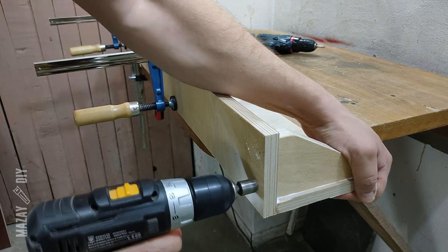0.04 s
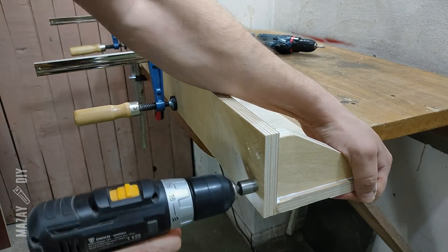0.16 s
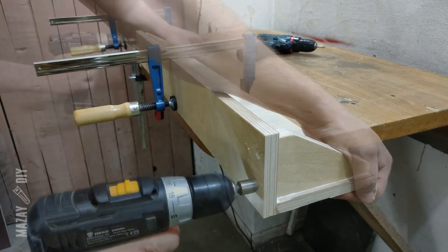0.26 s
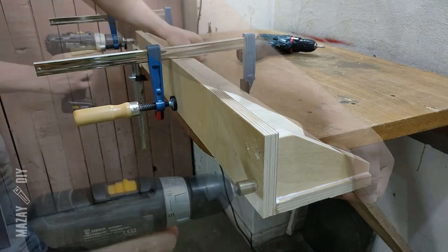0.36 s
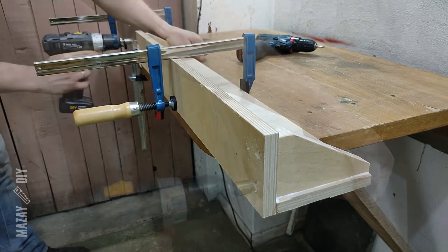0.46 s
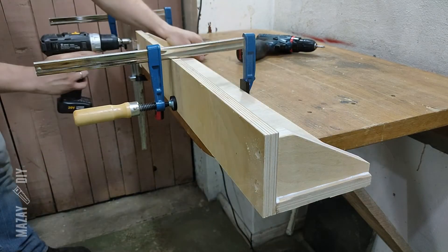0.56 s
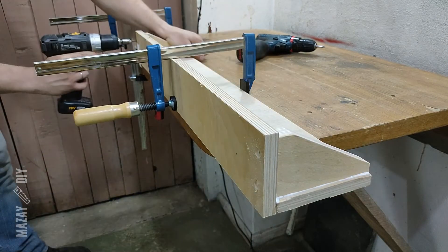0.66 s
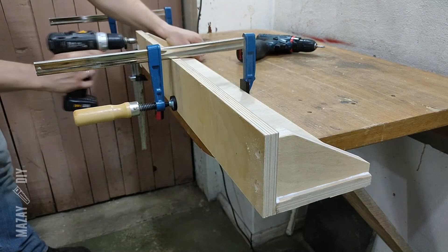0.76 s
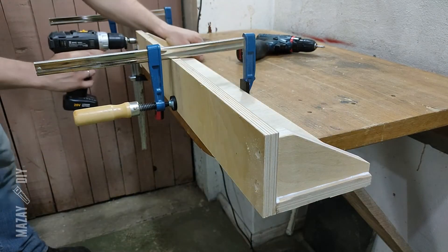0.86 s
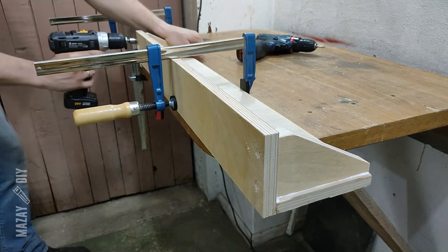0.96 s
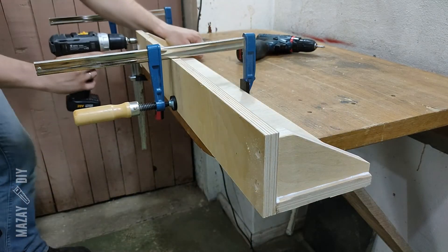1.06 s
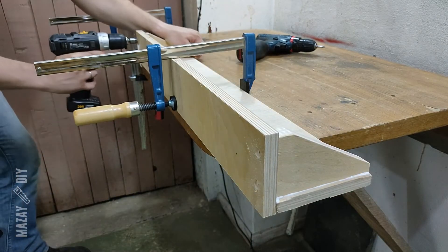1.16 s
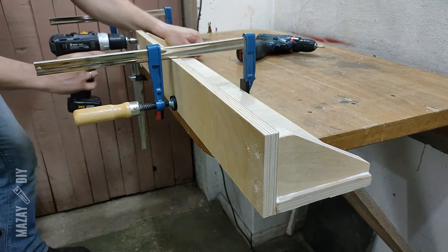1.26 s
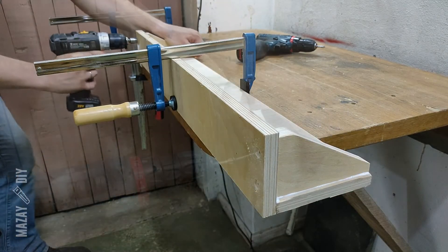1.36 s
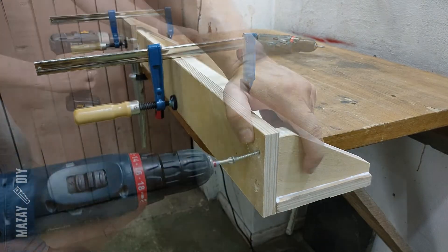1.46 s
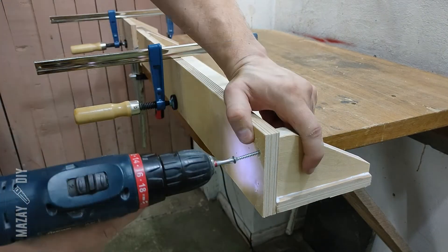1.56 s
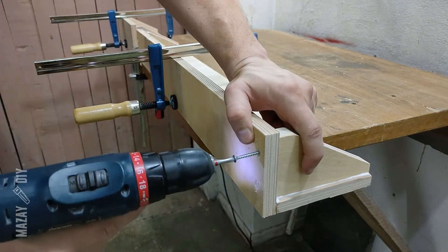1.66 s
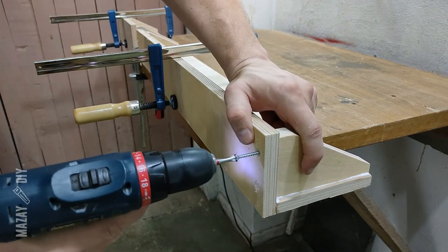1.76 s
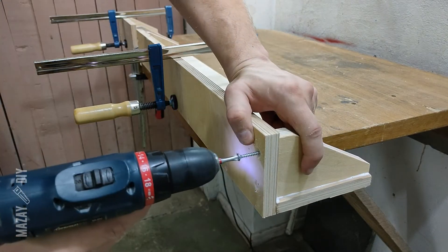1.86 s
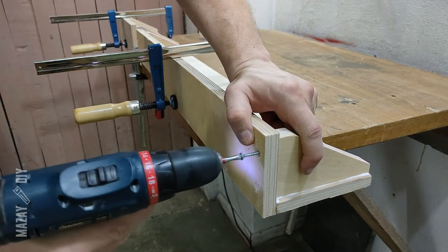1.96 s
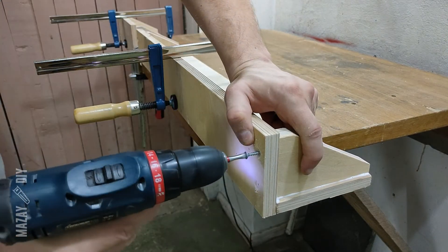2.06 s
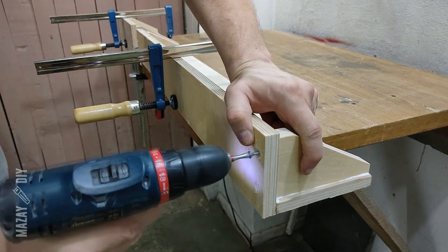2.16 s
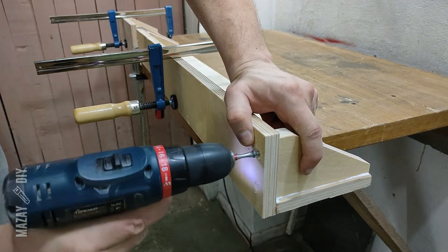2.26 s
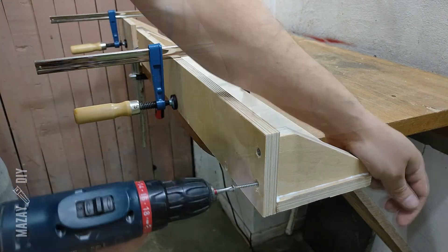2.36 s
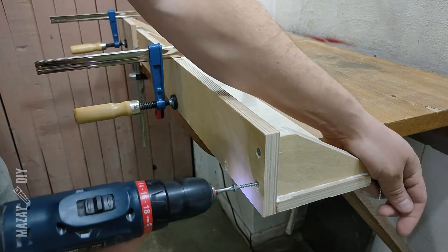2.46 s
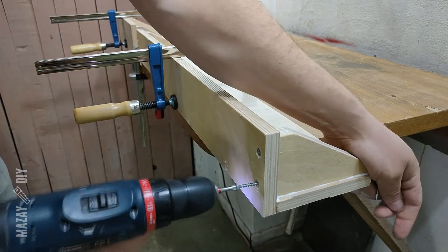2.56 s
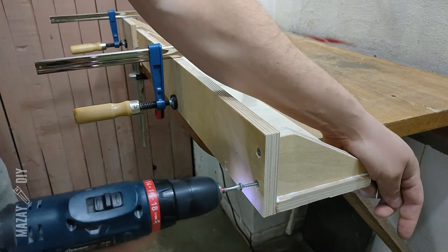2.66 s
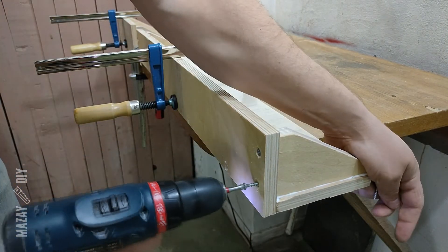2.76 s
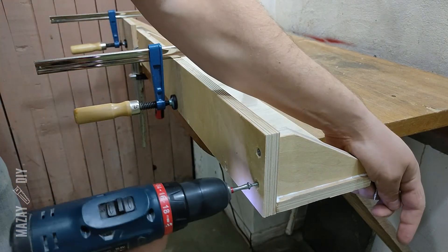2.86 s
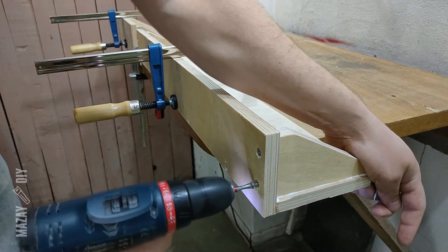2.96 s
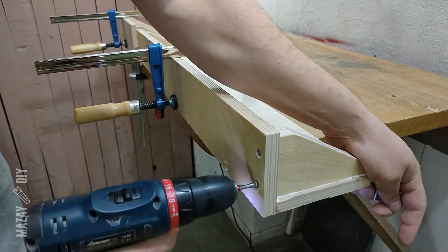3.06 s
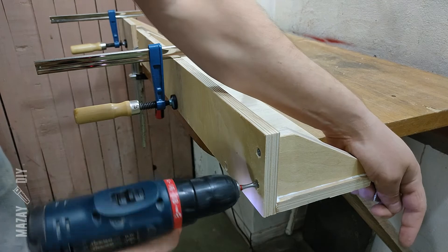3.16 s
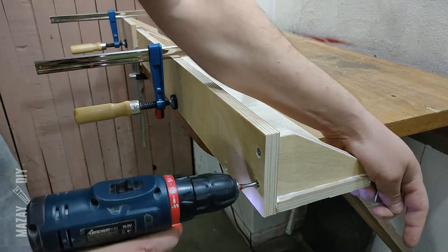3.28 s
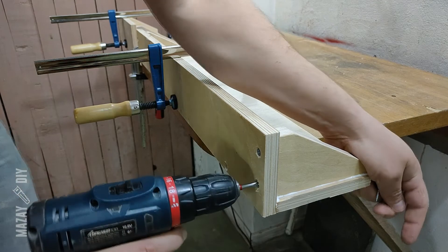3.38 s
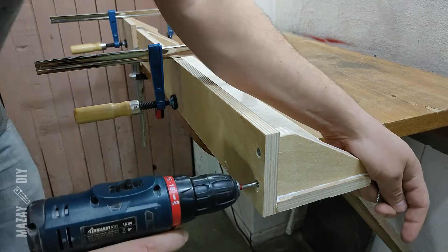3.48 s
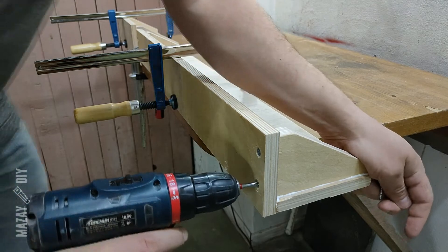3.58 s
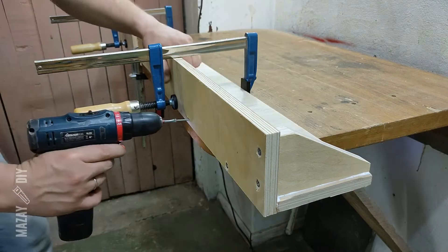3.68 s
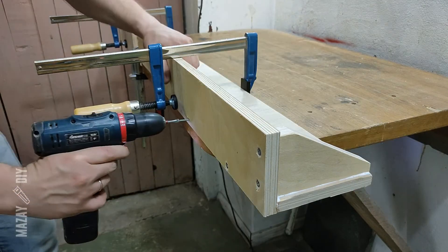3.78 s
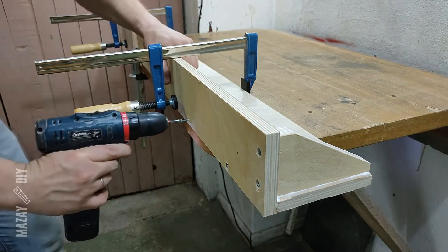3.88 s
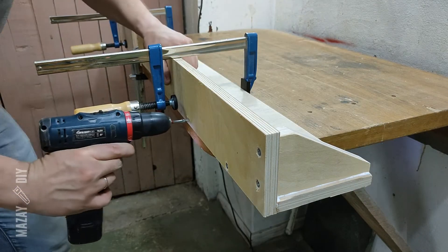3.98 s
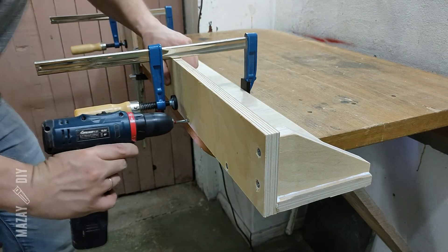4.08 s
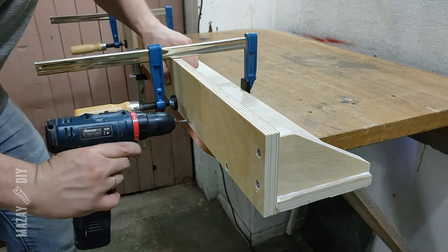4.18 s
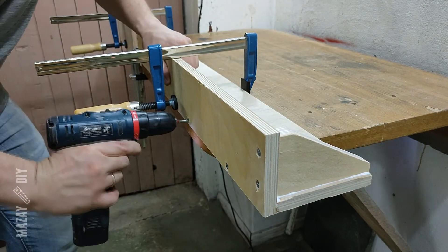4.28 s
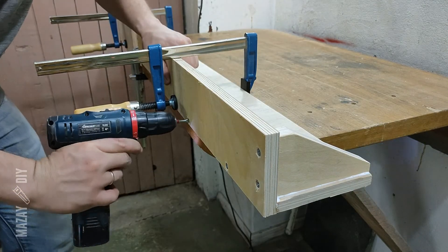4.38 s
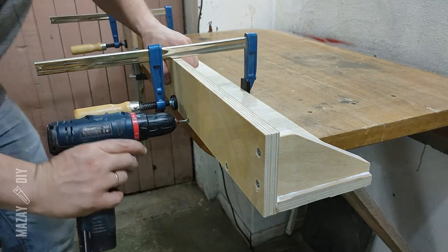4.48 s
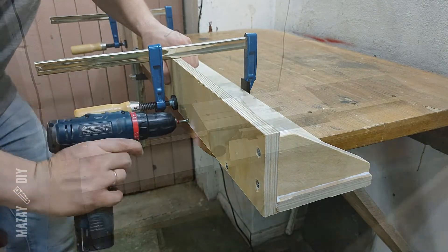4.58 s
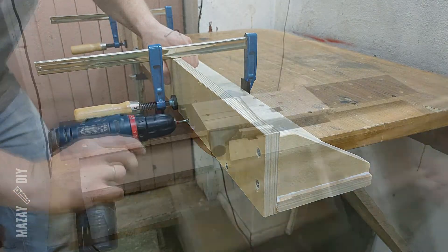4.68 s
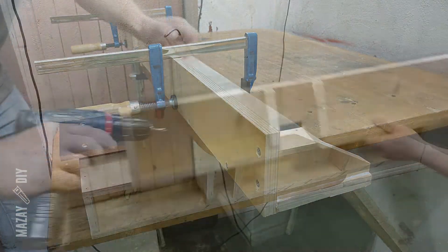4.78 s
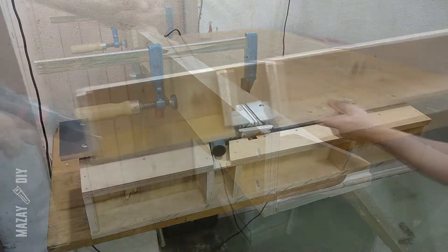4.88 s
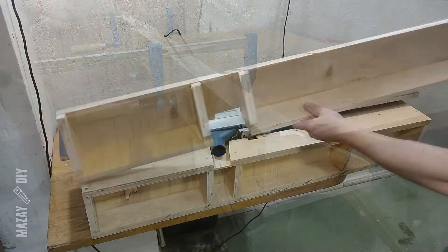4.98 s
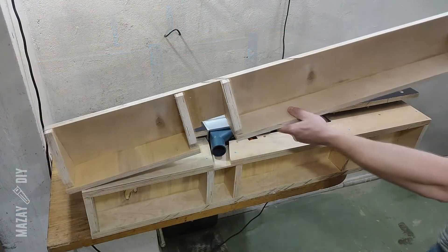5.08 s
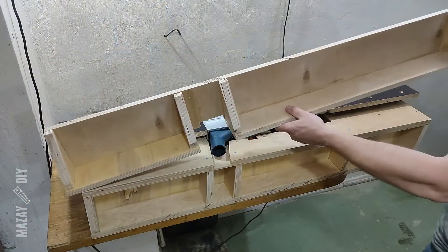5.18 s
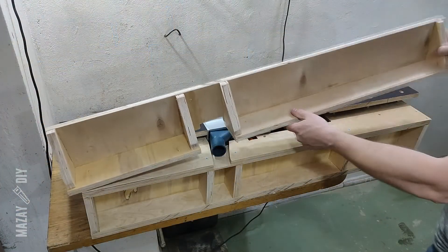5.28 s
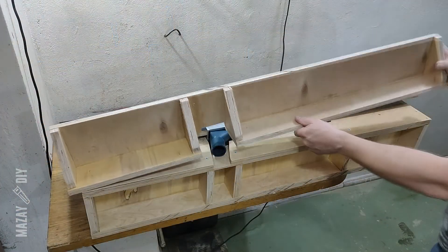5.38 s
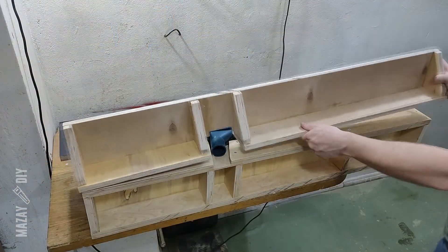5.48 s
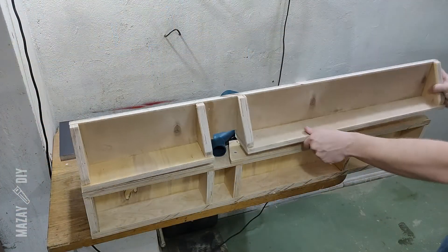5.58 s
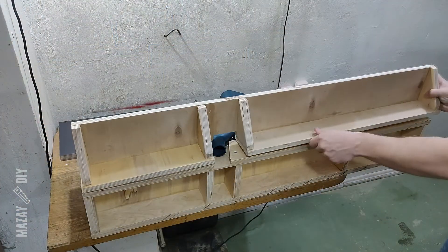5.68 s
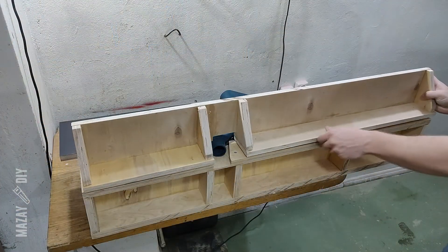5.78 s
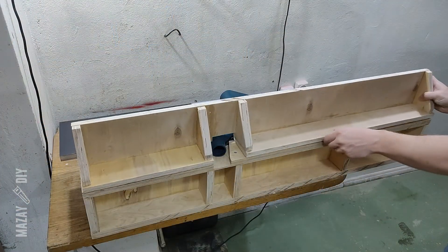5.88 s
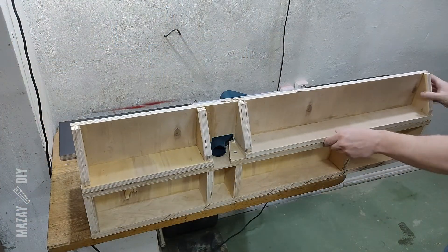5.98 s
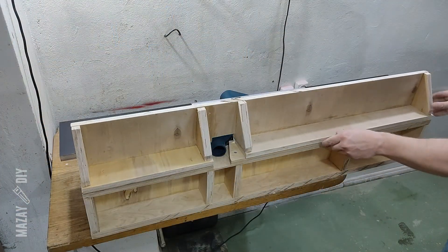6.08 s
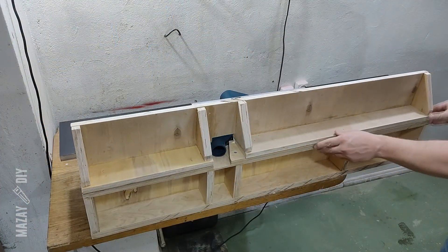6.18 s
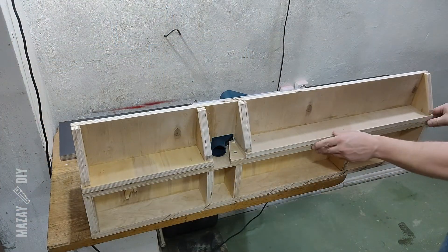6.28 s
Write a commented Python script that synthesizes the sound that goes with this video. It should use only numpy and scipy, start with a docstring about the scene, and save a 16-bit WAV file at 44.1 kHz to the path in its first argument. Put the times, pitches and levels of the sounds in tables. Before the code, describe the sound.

From the start a cordless drill runs steadily, with a motor hum, rattling gears and the tearing of chips as it bores two holes in plywood, the second from about 0.8 seconds. It fades by 1.7 seconds, when a second, lower-pitched drill spins up and drives a screw, its pitch sagging as the screw bites. After a brief dip near 2.5 seconds it runs again, ending in a loud ratcheting burst of the slipping clutch at about 3.2 seconds. Another run starts at 3.7 seconds, with two more loud clutch bursts at 4.3 and 4.6 seconds, then the motor winds down. From 5 seconds a plywood piece slides faintly on a bench with soft bumps, and the clearest knock comes near 5.9 seconds, ringing briefly. Everything sounds fairly close, with the short echo of a small, hard-walled workshop.

```python
"""In a small, hard-walled workshop a cordless drill bores two pilot holes in a plywood fence:
its rotor hums, its gears rattle, its bit tears chips. From 1.7 s a second drill drives screws, its
motor sagging as each bites; the first screw's sound fades quickly, a brief dip before the next.
At 3.2, 4.3 and 4.6 s the torque clutch slips in loud ratcheting bursts, steel balls jumping their
ramps. From 5 s the fence is slid and knocked into place on the bench, its plywood ringing."""
import sys
import numpy as np
from scipy import signal
from scipy.fft import rfft, irfft
from scipy.io import wavfile

SR = 44100
rng = np.random.default_rng(int(sys.argv[2]) if len(sys.argv) > 2 else 0)


def transcribe(signal):
    """Save signal, clipped to [-1, 1], as a 16-bit WAV file at the path in sys.argv[1]."""
    frames = np.atleast_2d(signal).T
    limited = np.clip(frames, -1, 1)
    pcm = np.round(limited * 32767).astype(np.int16)
    wavfile.write(sys.argv[1], SR, pcm)


N = 279572
T = np.arange(N) / SR


def undb(db):
    return 10 ** (np.asarray(db) / 20)


def unit(x):
    """Scale to rms 1."""
    return x / np.sqrt(np.mean(x ** 2) + 1e-20)


def curve(rows):
    """Linear interpolation of (t/s, value) rows."""
    return np.interp(T, *np.transpose(rows))


def envelope(start, stop, attack_s, release_s):
    """Linear rise, hold, exponential release."""
    return np.clip((T - start) / attack_s, 0, 1) * np.exp(-np.maximum(T - stop, 0) / release_s)


def at_hz(points, hz):
    """Read (f/Hz, value) rows on a log-frequency axis."""
    f, value = np.transpose(points)
    return np.interp(np.log(np.maximum(hz, 1)), np.log(f), value)


def colour(x, points, size=2048):
    """Minimum-phase filter from (f/Hz, level/dB) rows."""
    cepstrum = irfft(np.log(undb(at_hz(points, np.fft.rfftfreq(size, 1 / SR)))))
    cepstrum[1:size // 2] *= 2
    cepstrum[size // 2 + 1:] = 0
    return signal.oaconvolve(x, irfft(np.exp(rfft(cepstrum))))[:N]


def butter(x, hz, kind, order=2):
    return signal.sosfilt(signal.butter(order, min(hz, SR / 2 - 1), kind, fs=SR, output="sos"), x)


def resonance(x, hz, width_hz):
    """Band-pass, unity gain at the centre."""
    return signal.lfilter(*signal.iirpeak(hz, hz / width_hz, fs=SR), x)


def drift(rate_hz):
    """Slow noise, spread near 1."""
    count = int(N / SR * rate_hz) + 2
    return np.interp(T * rate_hz, np.arange(count), rng.standard_normal(count))


def grains(per_s, spread_db):
    """Tiny random impacts of uneven size."""
    hits = (rng.random(N) < per_s / SR) * rng.standard_normal(N)
    return unit(hits * undb(spread_db * np.clip(rng.standard_normal(N), -2, 2)))


# Workshop decay: f/Hz, T60/s
WORKSHOP_DECAY = [(150, 0.4), (400, 0.24), (1000, 0.29), (2500, 0.3), (6000, 0.23), (14000, 0.18)]

def workshop(x, wet_db, left_lag_ms=0, blend_hz=800):
    """Direct sound plus dense wall echoes, in stereo; the bass is alike on both sides."""
    t = T[:SR // 2]
    hz = np.fft.rfftfreq(len(t), 1 / SR)
    mid, side = rfft(rng.standard_normal((2, len(t))))
    apart = np.minimum(hz / blend_hz, 1) ** 1.3
    pair = (mid + np.array([[1], [-1]]) * side * apart) / np.sqrt(1 + apart ** 2)
    centres, t60s = np.transpose(WORKSHOP_DECAY)
    tail = 0
    for share, t60 in zip(np.eye(len(centres)), t60s):
        band = irfft(pair * at_hz(np.c_[centres, share], hz), len(t))
        tail += band * np.exp(-np.log(1000) * t / t60)
    tail *= t > .002  # the bench top answers first
    echoes = signal.oaconvolve(x[None], tail / np.sqrt(np.sum(tail ** 2) / 2), axes=1)[:, :N]
    direct = np.array([np.roll(x, round(left_lag_ms * SR / 1000)), x])
    return (direct + undb(wet_db) * echoes) / np.sqrt(1 + undb(wet_db) ** 2)


# Background spectrum: f/Hz, level/dB
ROOM_SPECTRUM = [(24, -54.5), (40, -12.5), (239, -19.5), (298, 0), (422, -14), (502, -15), (676, -8),
                 (866, -16), (15000, -26.5)]

def room_tone():
    """Faint, steady noise under everything."""
    return workshop(undb(-89.5) * unit(colour(rng.standard_normal(N), ROOM_SPECTRUM)), wet_db=2.5)


def shaft_turns(hz, wobble):
    """Shaft angle in turns; the speed wavers at random."""
    return np.cumsum(hz * (1 + wobble * drift(60))) / SR


def whine(turns, orders, flicker_db, flicker_hz=14):
    """Tones locked to the shaft, each flickering on its own."""
    tones = 0
    for order, db in orders:
        level = undb(db + flicker_db * drift(flicker_hz))
        tones += level * np.sin(2 * np.pi * (order * turns + rng.random()))
    return unit(tones)


def gear_teeth(turns, count, gear_ratio=5.7):
    """Tooth impacts whose uneven sizes repeat with each turn of the planet carrier."""
    tooth = np.floor(turns / gear_ratio * count).astype(int)
    return unit(np.diff(tooth, prepend=0) * rng.standard_normal(count)[tooth % count])


def gearbox(turns, spectrum, teeth_db, stages=2):
    """Each planetary stage rattles, throbbing with the shaft, and takes its own path to the walls."""
    throb = 1 + .5 * np.cos(2 * np.pi * turns)
    rattle = 0
    for _ in range(stages):
        impacts = grains(4000, spread_db=4) * throb + undb(teeth_db) * gear_teeth(turns, count=181)
        rattle += workshop(colour(impacts, spectrum), wet_db=5, left_lag_ms=.17)
    return unit(rattle)


# Shaft speed: t/s, f/Hz
PILOT_SPEED = [(.2, 337.6), (.3, 344.8), (.5, 349), (.7, 350.7), (.85, 343.7), (1.05, 340.5), (1.7, 334.1)]
# Holes: bit enters t/s, breaks through t/s, cutting level/dB, added rattle level/dB
PILOT_HOLES = [(-.05, 0.269, -42, -37.5), (.775, 1.6, -42.6, -54)]
# Rotor hum: t/s, level/dB
PILOT_HUM = [(0.0, -30.5), (0.262, -32.5), (0.316, -37), (0.338, -54), (0.352, -41), (0.516, -39.5),
             (0.658, -56.5), (0.894, -46.5), (1.056, -32), (1.256, -29), (1.528, -34), (1.6, -38)]
# Motor tones: shaft order, level/dB
PILOT_ORDERS = [(3, 10), (9, 9), (15, 4), (18, 1), (21, 10), (24, 1), (27, -1), (30, 0), (31, 1.5),
                (33, -6), (36, -1), (39, -7)]
# Gear mesh tones: shaft order, level/dB
PILOT_MESHES = [(2.57, -26), (2.76, -2), (4.65, -1.5), (8.3, 2), (10.8, -6), (11.7, -8), (17.9, 1),
                (18.55, -3.5), (22.9, 4), (24.85, 2.5), (28.5, -9), (32.1, -6), (35.8, -7), (37.1, 3),
                (40.4, -8)]
# Gear rattle spectrum: f/Hz, level/dB
PILOT_RATTLE = [(880, -21.5), (1500, -3), (1610, 3), (1810, -3.5), (2680, -5), (3140, -7.5), (4020, -1.5),
                (4560, -11.5), (5510, -7.5), (6200, -2.5), (9850, -3.5), (13000, -4), (15800, -7.5)]
# Cutting spectrum: f/Hz, level/dB
CHIP_SPECTRUM = [(240, -25.5), (380, -5.5), (540, -11), (700, -9), (956, -7), (1070, -10), (1460, -13.5),
                 (1570, -19.5), (2110, -18.5), (3500, -14), (4550, -49.5), (7700, -120)]

def pilot_drill(free_hz=354.3, full_sag_hz=17.8, end_s=1.675, fade_s=.18):
    """The unbalanced rotor hums, the gears rattle and whine under load, the bit tears chips."""
    hz = curve(PILOT_SPEED)
    load = np.clip((free_hz - hz) / full_sag_hz, 0, 1)
    turns = shaft_turns(hz, wobble=.0015)
    running = np.clip((end_s - T) / fade_s, 0, 1)
    rattle_gain, cut_gain = running * undb(-42.6), 0
    for start, stop, cut_db, rattle_db in PILOT_HOLES:
        cut_gain += running * np.sqrt(load) * undb(cut_db) * envelope(start, stop, .013, release_s=.5)
        rattle_gain += running * undb(rattle_db) * envelope(start, stop, .013, release_s=.24)
    hum_gain = undb(curve(PILOT_HUM) + .5) * np.minimum(2 * running, 1)
    hum = hum_gain * np.sqrt(2) * np.sin(2 * np.pi * turns) * undb([[.4], [-.4]])
    motor = undb(-42 - 5 * load) * whine(turns, PILOT_ORDERS, flicker_db=5) * running
    meshes = undb(-5) * whine(turns, PILOT_MESHES, flicker_db=7.5) * np.sqrt(rattle_gain * cut_gain)
    tones = workshop(motor + meshes, wet_db=-3, left_lag_ms=.19)
    gears = undb(1.5) * gearbox(turns, PILOT_RATTLE, teeth_db=-3) * rattle_gain
    tearing = grains(2500, spread_db=9.9) + .53 * gear_teeth(turns, count=47)
    chips = undb(3.5) * unit(colour(tearing, CHIP_SPECTRUM))
    cutting = workshop(chips, wet_db=2.5, left_lag_ms=.21) * cut_gain
    return hum + tones + gears + cutting


# Trigger pulls: half pressed t/s, fully pressed t/s, fade starts t/s, fade/s, free shaft f/Hz, level/dB,
# screw half bitten t/s, bite time/s
TRIGGER_PULLS = [(1.67, 1.955, 2.39, .095, 266, -36.3, 2.275, .035),
                 (2.48, 2.595, 3.36, .265, 275, -37.9, 2.99, .075),
                 (3.66, 3.672, 4.445, .26, 279, -40, 4.07, .06),
                 (4.565, 4.565, 4.705, .19, 279, -37, 4.5, .04)]

def screw_motor(half_speed=.62, squeeze_s=.075, spin_up_s=.033, sag_hz=62.97, load_db=2.3, slip_load=.44):
    """A pull spins the motor up; the screw loads it, a clutch slip relieves it; pitch and level fall."""
    slips = sum(envelope(start, stop, attack_s=.1, release_s=.08) for start, stop, *_ in CLUTCH_SLIPS)
    slipping = np.minimum(slips, 1)
    hz, torque, gain = 0, 0, 0
    for half, full, stop, fade_s, free_hz, db, bite, bite_s in TRIGGER_PULLS:
        eased = half_speed * (1 - np.exp(-np.maximum(T - half, 0) / squeeze_s))
        spun_up = 1 - np.exp(-np.maximum(T - full, 0) / spin_up_s)
        fade = np.clip(1 - (T - stop) / fade_s, 0, 1) ** 1.25
        drive = (eased + (1 - eased) * spun_up) * fade
        load = .5 + .5 * np.tanh((T - bite) / (2 * bite_s))
        load += slipping * (slip_load - load)
        hz = np.maximum(hz, drive * (free_hz - sag_hz * load))
        torque = np.maximum(torque, drive * load)
        gain = np.maximum(gain, drive ** 1.1 * undb(db + load_db * load))
    return hz, torque, gain


# Gear rattle spectrum: f/Hz, level/dB
SCREW_RATTLE = [(88, -85.5), (150, -60), (333, -5.5), (522, -4.5), (564, -5), (660, -3), (937, -10),
                (1280, -6.8), (1650, -11), (2300, -4.5), (2630, -4.5), (6080, -12), (7110, -8),
                (10700, -13), (15800, -12.3)]
# Tones of 3 rotor poles and 9 pinion teeth: shaft order, level/dB
SCREW_ORDERS = [(2, -8), (3, 3), (4, -7.5), (6, -4.5), (9, 4), (12, -12.5), (18, -11), (27, 1.5), (36, -7),
                (45, -9.5), (54, -10)]
# Casing modes: f/Hz, width/Hz, level/dB
CASING_MODES = [(650, 150, -1), (2340, 340, -3.3), (4080, 450, -3)]
# Pinion overtones under load: shaft order, level/dB
PINION_ORDERS = [(3, 0), (6, -6), (9, -7), (18, 5), (27, -4), (36, -6), (45, -8), (54, -7), (63, -8)]

def screw_drill(hz, load, turns, backlash_turns=.05):
    """Gears rattle, duller when slow; motor tones sweep the casing modes; the loaded pinion whines."""
    speed = hz / np.max(hz)
    rattle = gearbox(turns, SCREW_RATTLE, teeth_db=-8)
    rattle = speed * rattle + (1 - speed) * butter(rattle, 5000, "low", order=1)
    loose_turns = turns + backlash_turns * drift(45) * (1.3 - speed)  # gear play roughens the tones
    tight_turns = (loose_turns + turns) / 2  # load takes up half the play
    motor = whine(loose_turns, SCREW_ORDERS, flicker_db=3.5, flicker_hz=45)
    casing = sum(undb(db) * resonance(motor, centre, width) for centre, width, db in CASING_MODES)
    tones = undb(-3.5) * (.2 * motor + casing) * np.sqrt(speed)
    pinion = undb(-9.5) * load ** 1.5 * whine(tight_turns, PINION_ORDERS, flicker_db=3, flicker_hz=45)
    return rattle + workshop(tones + pinion, wet_db=-1)


# Drill housing and board modes: f/Hz, width/Hz, level/dB
HOUSING_MODES = [(349.5, 60, 2), (752.5, 41, -0.5), (864, 58, 8.5), (1271, 110, 5), (1740, 68, -2),
                 (1863, 170, -0.5)]
# Radiation spectrum: f/Hz, level/dB
CLUTCH_SPECTRUM = [(140, -37), (260, -24), (350, -10), (520, -9), (860, -7.5), (1250, -3.2), (2000, -8.5),
                   (3200, -12), (5000, -21), (6800, -12.5), (8400, -14), (10300, -20), (12800, -18),
                   (15800, -20)]

def housing(force, wet_db):
    """Clutch blows pass through housing and board into the room."""
    ring = sum(undb(db) * resonance(force, hz, width) for hz, width, db in HOUSING_MODES)
    return workshop(colour(force + .5 * ring, CLUTCH_SPECTRUM), wet_db)


# Slips: start t/s, stop t/s, level/dB, attack/s, decay/s, board ring f/Hz, ring lift/dB
CLUTCH_SLIPS = [(3.171, 3.354, -23.6, .002, 0.019, 868, 3), (4.266, 4.44, -23, 0.0054, 0.028, 374, 2),
                (4.579, 4.685, -23.4, 0.0091, .03, 374, 1)]

def clutch(turns, jitter_s=.00005, scatter_db=1.13, crack_s=.0018, split_hz=2600, stagger_s=.0019):
    """Screw home: three steel balls jump their ramps every second motor turn, with a thump and cracks."""
    gain = sum(undb(db) * envelope(start, stop, attack_s, decay_s)
               for start, stop, db, attack_s, decay_s, *_ in CLUTCH_SLIPS)
    jumps = np.flatnonzero(np.diff(np.floor(turns / 2)))
    lateness, weakness = rng.standard_normal((len(jumps), 2)).T
    landings = np.clip(jumps + (jitter_s * SR * lateness).astype(int), 0, N - 1)
    blows = np.zeros(N)
    blows[landings] = undb(-scatter_db * weakness)
    blows[[int((start + .0025) * SR) for start, *_ in CLUTCH_SLIPS]] = 1  # first let-go
    blows *= gain
    decay = np.exp(-T[:SR // 50] / crack_s)
    cracks = signal.oaconvolve(blows, decay / np.linalg.norm(decay))[:N]
    sound = housing(butter(blows, split_hz, "low"), wet_db=4)  # thump
    for ball in range(3):  # the balls land in turn
        chatter = np.roll(cracks, int(ball * stagger_s * SR)) * rng.standard_normal(N) / np.sqrt(3)
        bright = butter(chatter, split_hz, "high", order=1)
        dull = butter(chatter, split_hz, "low", order=1)
        sound += undb(2.5) * housing(bright + .44 * dull, wet_db=5)
    board = 0
    for start, stop, _, attack_s, decay_s, ring_hz, lift_db in CLUTCH_SLIPS:
        ring = resonance(sound, ring_hz, width_hz=80)
        board += (undb(lift_db) - 1) * envelope(start, stop, attack_s, decay_s) * ring
    return undb(3.3) * unit(sound + board) * np.sqrt(np.mean(gain ** 2))


# Pushes: start t/s, end t/s, rumble level/dB, hiss level/dB
FENCE_PUSHES = [(4.976, 5.04, -64.5, -83), (5.14, 5.22, -77, -84), (5.32, 5.4, -55.5, -72.5)]
# Friction spectrum: f/Hz, level/dB
RUB_SPECTRUM = [(120, -94), (200, -49), (486, -1.5), (602, -12.5), (786, -5.5), (973, -27), (1270, -18.5),
                (1600, -23), (7250, -41), (14000, -54.5)]

def fence_slides(attack_s=.075, release_s=.055):
    """Grit rubs between board and bench: a light push hisses, a firm one makes the wood rumble."""
    rub = unit(colour(grains(1500, spread_db=3.4), RUB_SPECTRUM))
    hiss = unit(butter(rub, 1300, "high", order=3))
    sound = 0
    for start, stop, rumble_db, hiss_db in FENCE_PUSHES:
        push = envelope(start, stop, attack_s, release_s) ** 2
        touch = envelope(start, stop, attack_s / 2, release_s / 2)
        sound += undb(rumble_db) * push * rub + undb(hiss_db) * touch * hiss
    return sound


# Contacts with the bench: t/s, relative level/dB, decay/s, low-pass f/Hz
FENCE_CONTACTS = [(4.983, -16.5, 0.012, 601), (5.016, -13.5, 0.023, 480), (5.19, -46, 0.019, 900),
                  (5.524, -29, 0.013, 800), (5.552, -15, 0.011, 750), (5.585, -28, 0.014, 650),
                  (5.69, -38.5, 0.013, 900), (5.828, -38, .008, 1488), (5.863, 0, 0.0082, 2000),
                  (5.902, -9, 0.021, 1900)]
# Plywood modes: f/Hz, width/Hz, level/dB
FENCE_MODES = [(443, 32.4, -3), (830, 56, -20), (1193, 48, -4), (1880, 170, -24), (2290, 44, -30),
               (2520, 44, -29), (2670, 46, -20), (2800, 30, -36), (2960, 16, -48)]
# Thud spectrum: f/Hz, level/dB
THUD_SPECTRUM = [(120, -36), (200, -35), (290, -8), (440, -1.5), (600, -2), (800, 0), (1200, -9.5),
                 (2000, -17), (2800, -35), (4000, -38), (9000, -33), (15000, -52)]

def fence_knocks():
    """Wood meets wood: short, gritty contacts thud and ring the plywood box."""
    force, t = np.zeros(N), T[:SR // 5]
    for start, db, decay_s, cutoff_hz in FENCE_CONTACTS:
        contact = rng.standard_normal(len(t)) * np.exp(-t / decay_s)
        contact /= np.linalg.norm(contact)
        onset = int(start * SR)
        force[onset:onset + len(t)] += undb(db) * (butter(contact, cutoff_hz, "low") + .042 * contact)
    ring = sum(undb(db) * resonance(resonance(force, hz, width), hz, width)
               for hz, width, db in FENCE_MODES)
    return undb(-71.5) * unit(ring) + undb(-59) * unit(colour(force, THUD_SPECTRUM))


def scene():
    """Boring, screwing, then the fence; one motor turns both the screw drill's gears and its clutch."""
    hz, load, gain = screw_motor()
    turns = shaft_turns(hz, wobble=.004)
    background = room_tone()
    boring = pilot_drill()
    screwing = gain * screw_drill(hz, load, turns) + clutch(turns)
    fence = workshop(fence_slides() + fence_knocks(), wet_db=8.5)
    return background + boring + screwing + fence


def record(dry, top_hz=15900):
    """The microphones pass little bass; the right one is duller at the very top."""
    left, right = butter(dry, 250, "high", order=6) + undb(-16.5) * dry
    left = colour(left, [(100, 1.17), (9500, .81), (13000, .011), (16000, 1.8)])
    right = colour(right, [(100, .5), (9500, .5), (13000, -4.5), (16000, -2.5)])
    low_pass = signal.ellip(10, .2, 80, top_hz, fs=SR, output="sos")
    return signal.sosfilt(low_pass, np.array([left, right]))


dry = scene()
out = record(dry)
transcribe(out)
```